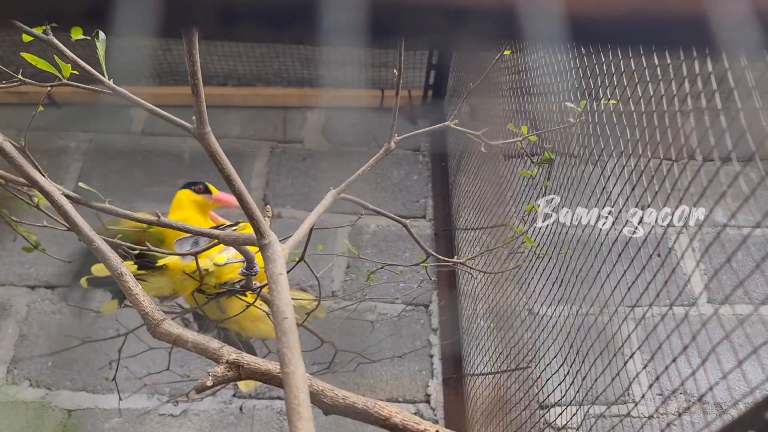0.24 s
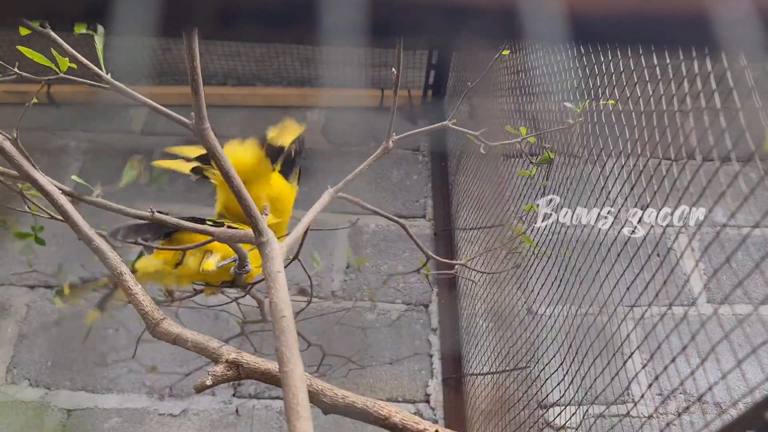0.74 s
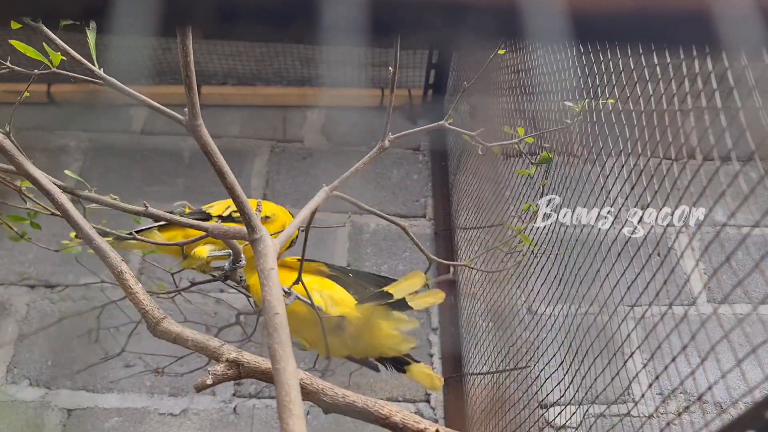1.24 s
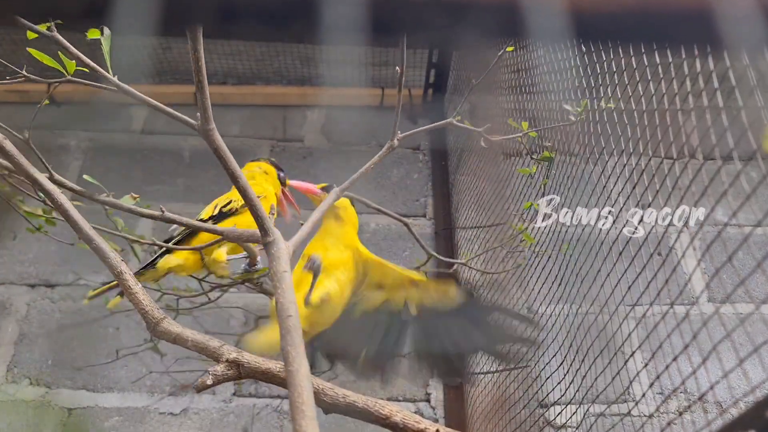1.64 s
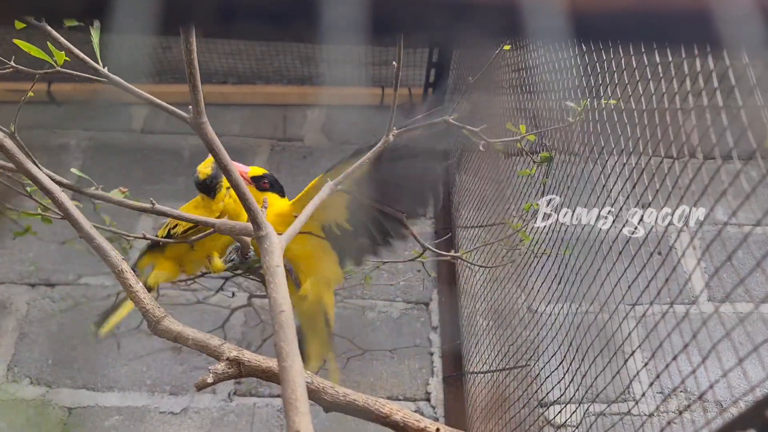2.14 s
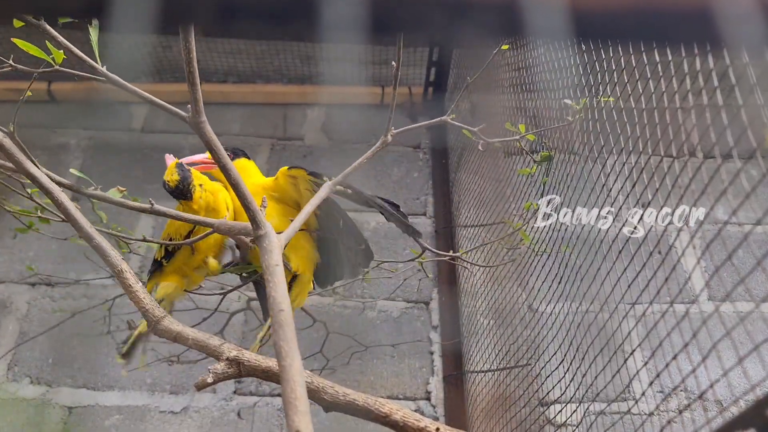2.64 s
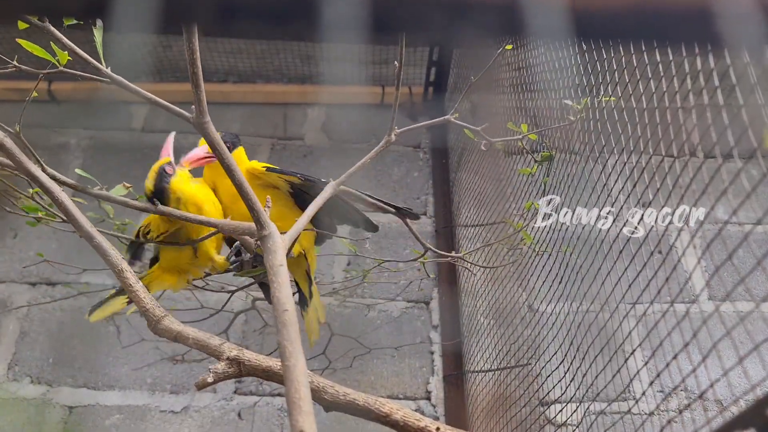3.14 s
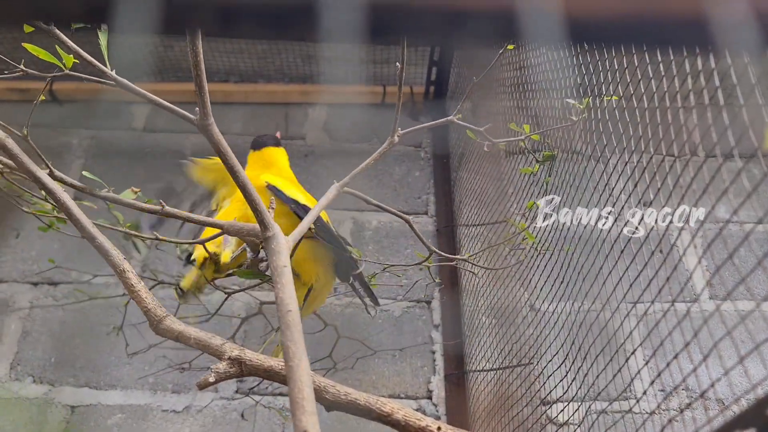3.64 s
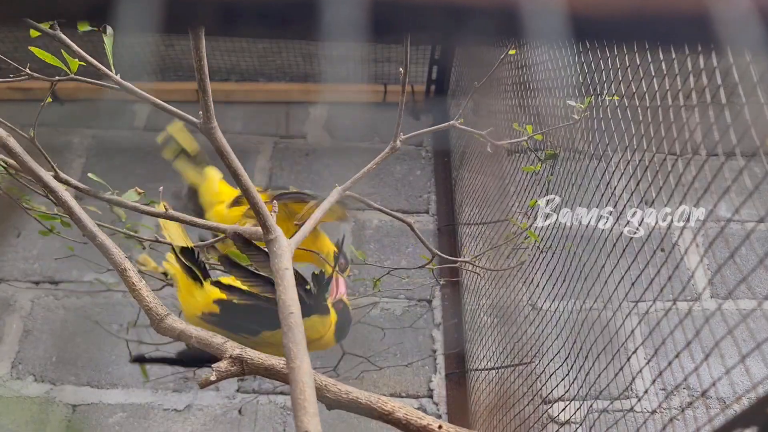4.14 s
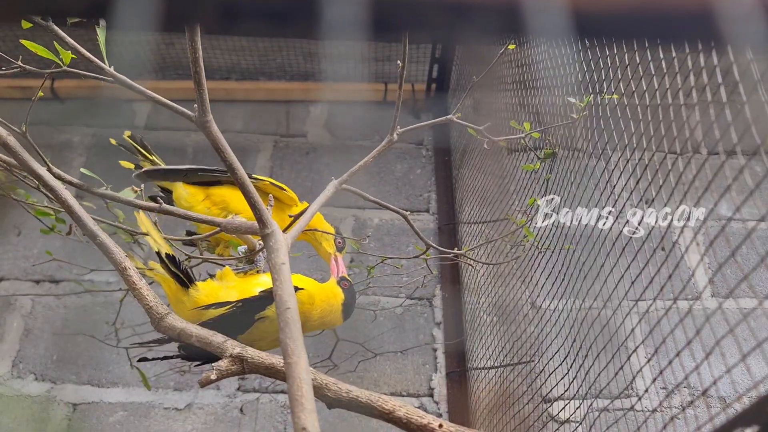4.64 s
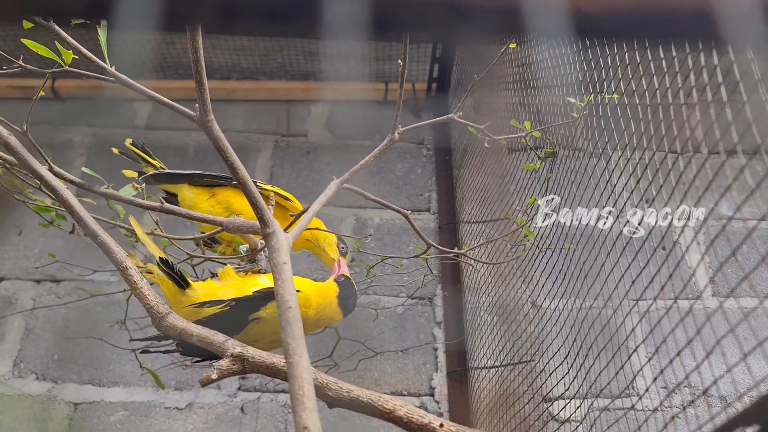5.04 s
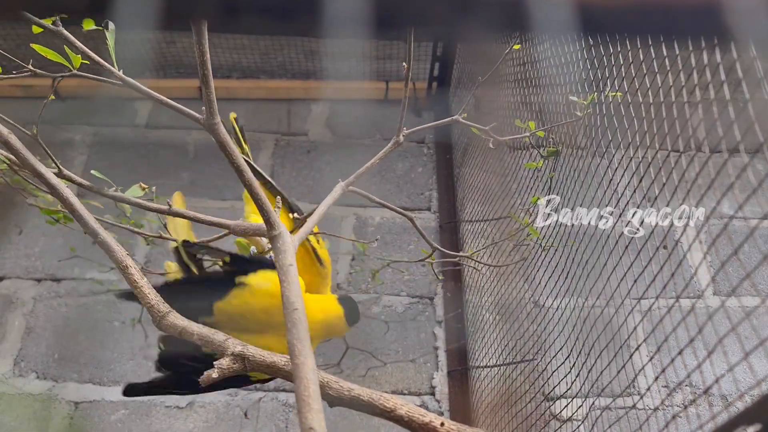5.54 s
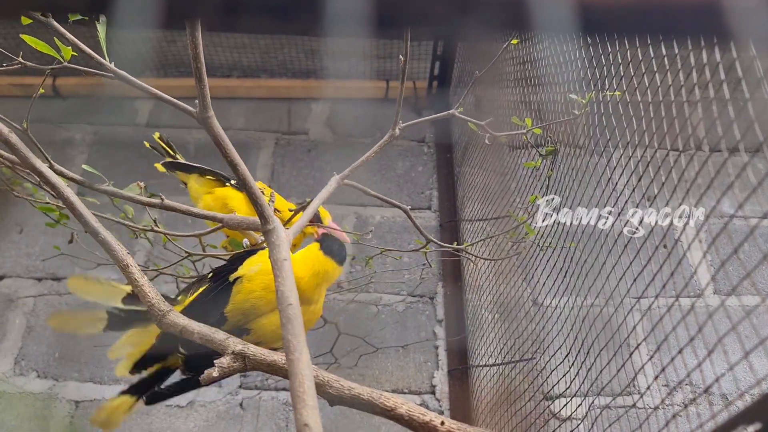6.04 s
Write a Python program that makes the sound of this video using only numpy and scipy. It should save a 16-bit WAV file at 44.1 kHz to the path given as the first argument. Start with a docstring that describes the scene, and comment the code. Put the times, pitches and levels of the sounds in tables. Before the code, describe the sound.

A songbird squalls over and over in harsh, nasal, rasping cries while wings slap and rustle against twigs in a small walled aviary.

```python
"""A small brick aviary, where two orioles fight on a branch. One squalls again and again: harmonics from a
syrinx, roughened by chaotic membranes, pass a throat filter and a beak that sets three ranges. Many calls drop
from a whistle into a nasal, rasping note; the other bird slips in one thin falling chirp. Wings slap and rustle
against the twigs as shaped noise, walls add echoes, and a distant engine (a wavering sine and low noise) drones
under quiet outdoor air (filtered noise)."""
import sys
import numpy as np
from scipy import signal
from scipy.fft import rfft, irfft, next_fast_len
from scipy.io import wavfile
from scipy.ndimage import uniform_filter1d, map_coordinates

SR = 44100
rng = np.random.default_rng(int(sys.argv[2]) if len(sys.argv) > 2 else 0)


def transcribe(signal):
    """Save signal, clipped to [-1, 1], as a 16-bit WAV file at the path in sys.argv[1]."""
    frames = np.atleast_2d(signal).T
    limited = np.clip(frames, -1, 1)
    pcm = np.round(limited * 32767).astype(np.int16)
    wavfile.write(sys.argv[1], SR, pcm)


N = 277389  # length in samples


def amp(db):
    """Decibels express an amplitude ratio on a logarithmic scale."""
    return 10 ** (np.asarray(db) / 20)


def unit(x):
    """Normalization: division by the root mean square gives unit power."""
    return x / np.sqrt(np.mean(x ** 2) + 1e-20)


def along(points, hz):
    """Spectral envelope: (Hz, value) points are joined on a logarithmic frequency axis."""
    f, v = np.transpose(points)
    return np.interp(np.log(hz + 1), np.log(f + 1), v)


def curves(rows):
    """Linear interpolation in time: one curve for each column after the time."""
    s, *cols = np.transpose(rows)
    return [np.interp(np.arange(N) / SR, s, c) for c in cols]


def wobble(rate):
    """Random modulation: a smooth spline through Gaussian knots, rate knots a second."""
    knots = rng.standard_normal(int(N * rate / SR) + 4)
    return map_coordinates(knots, [np.arange(N) * rate / SR])


def filtered(x, response):
    """Linear filtering: the spectrum is multiplied by a response of frequency."""
    m = next_fast_len(N + SR // 2)
    return irfft(rfft(x, m) * response(np.fft.rfftfreq(m, 1 / SR)), m)[..., :N]


def below(hz, edge_hz, order):
    """Low-pass gain: it falls to one half at the edge."""
    return 1 / (1 + (hz / edge_hz) ** order)


def noise(spectrum, apart_hz=1500):
    """Diffuse-field coherence: unit-rms stereo noise, alike in both ears in the bass, unrelated in the treble."""
    def mid_side(hz):
        turn = np.arccos(below(hz, apart_hz, order=2)) / 2
        return amp(along(spectrum, hz)) * [np.cos(turn), np.sin(turn)]

    mid, side = filtered(rng.standard_normal((2, N)), mid_side)
    return unit(np.array([mid + side, mid - side]))


def squalls(edge_db=-0.5, blare_db=-0.5, body_db=-2.0, calm_sway_db=1.0, rough_sway_db=3.5):
    """Source-filter principle: the syrinx sounds through the throat; the beak sets the strength of each range."""
    # resonances of the throat: frequency_hz, gain_db
    throat = [(350, -65), (600, -37.5), (811, -10.5), (1290, -8), (1610, 0.5), (2110, -5.5), (2520, -7.5),
              (2900, -7), (3370, -2.5), (4310, -13), (6230, -13), (7550, -24.5), (10200, -28), (15800, -38)]
    # limits of the voice's ranges (fundamental, body to blare, blare to edge, fizz): edge_hz
    range_edges = [950, 2100, 4200, 11000]
    steady_above_hz = 1240  # a voice pitched higher than this sways less in strength

    pitch, rough, levels, ends_db, airflow = cries()
    pitch, rough, levels = with_surges(pitch, rough, levels)
    pitch, rough = with_whistles(pitch, rough)
    slide, beat_db = stutter()
    source = syrinx(pitch * slide, rough)
    tone = filtered(source, lambda hz: amp(along(throat, hz)) * (1 - below(hz, 435, order=12)))

    # body, blare and edge are levelled, then each follows its own strength
    bottom, low, high, top = range_edges

    def three_bands(hz):
        return np.diff([0 * hz, below(hz, low, order=16), below(hz, high, order=16), 1 + 0 * hz], axis=0)

    ranges = filtered(tone, three_bands)
    power = np.abs(uniform_filter1d(ranges ** 2, size=900, axis=1))
    ranges = ranges / np.sqrt(power + 0.00099 * power.mean(axis=1, keepdims=True))

    # a strained voice breaks, throwing its strength from one range to another
    sway_db = calm_sway_db + rough_sway_db * rough * below(pitch, steady_above_hz, order=12)
    sway = sway_db * np.array([wobble(40) for _ in ranges])
    voice = np.sum(ranges * amp(sway + levels + [[body_db], [blare_db], [edge_db]]), axis=0)

    # the way the beak points colours the fundamental and the highest fizz
    ends = filtered(voice, lambda hz: np.array([below(hz, bottom, order=14), 1 - below(hz, top, order=12)]))
    voice = voice + np.sum((amp(ends_db) - 1) * ends, axis=0)
    grit_db = 1.1 * rough * wobble(260)
    return airflow * voice * amp(beat_db + grit_db)


def cries():
    """Articulation: each cry opens from a shut beak, holds, then sags in pitch and fades."""
    # the cries, levels ahead of beak, surge and trim: start_s, end_s, pitch_hz, roughness (0-1), body_db,
    # blare_db, edge_db, beak_opening_s (time constant), fundamental_gain_db, fizz_gain_db
    rows = np.array([(0, 0.199, 771, .56, -30, -22.5, -19, 0.00067, 1, 5),
                     (0.319, 0.961, 746.7, 0.55, -29, -28.5, -27.5, 0.034, -16, 5.5),
                     (1.134, 1.746, 792, 0.51, -27.5, -31, -27.5, 0.087, -5.5, 0),
                     (1.937, 2.432, 742.5, 0.3, -28, -34.5, -46, 0.022, 1.5, 16),
                     (2.616, 3.231, 823.4, 0.63, -30, -17.5, -35, 0.088, -2, 12),
                     (3.341, 3.733, 804.3, .7, -29.5, -16, -34.5, .065, -0.5, 11),
                     (3.849, 4.175, 805, .62, -24.5, -19.5, -29, .1, -4, 9.5),
                     (4.279, 4.628, 1120, 0.86, -27, -31, -28, 0.075, 0.5, -3),
                     (4.787, 5.166, 1290, .88, -30, -36, -33, 0.042, 3, -11),
                     (5.269, 5.714, 992, 0.82, -25.5, -28.5, -30.5, .1, 0, 6.5),
                     (5.845, 5.916, 1505, 0.39, -28.5, -30.5, -28.5, 0.072, -13, -8),
                     (5.943, 6.3, 939.5, .52, -26.5, -25, -20, 0.065, -4, 5)])
    # weakening while the beak is still shut, one entry each for body, blare and edge: loss_db
    shut = [7, 20.5, 21]
    # weakening as a cry runs out, one entry each for body, blare and edge: loss_db
    fade = [3.5, 6.5, 8.5]
    fade_s, sag_s, sag = 0.046, .05, 0.086  # time constants; share by which the pitch sinks at the end
    attack_s, release_s = 0.0027, 0.0076  # time constants of the airflow

    t = np.arange(N) / SR
    current = np.searchsorted((rows[:-1, 1] + rows[1:, 0]) / 2, t)
    start, end, pitch, rough, body, blare, edge, opening, fundamental, fizz = rows[current].T
    age, left = np.maximum(t - start, 0), np.maximum(end - t, 0)
    levels = np.array([body, blare, edge])
    levels = levels - np.outer(shut, np.exp(-age / opening)) - np.outer(fade, np.exp(-left / fade_s))
    airflow = np.exp(np.minimum(t - start, 0) / attack_s + np.minimum(end - t, 0) / release_s)
    sagging = pitch * (1 - sag * np.exp(-left / sag_s))
    return sagging, rough, levels, np.array([fundamental, fizz]), airflow


def with_surges(pitch, rough, levels):
    """Effort modulation: the pitch arches to another note while clarity and strength hold on a plateau."""
    # surges of effort that clear or break a cry and lift or lower its ranges: middle_s, length_s, pitch_hz,
    # roughness (0-1), body_lift_db, blare_lift_db, edge_lift_db
    surges = [(0.023, 0.073, 730, 0.11, -7.5, -3, 5.5), (0.136, 0.12, 912, 0.06, 2.5, -2, 3),
              (0.529, .16, 848, 0, -5.5, 11, -1.5), (.62, 0.068, 790, 0.44, 9, 0, -2),
              (0.867, 0.11, 713.7, 0.26, 8, -4, -1), (1.448, 0.096, 818, 0.2, 1, 4, -2),
              (1.519, 0.059, 870, 0, 6, 9, 0.5), (1.612, .12, 807.4, 0.19, -1.5, 1.5, 9),
              (1.687, 0.093, 721.4, 0.14, 0.5, 6.5, 1), (2.064, 0.13, 780, 0.13, 1, 3, -0.5),
              (2.277, .16, 803, 0.07, 1, 0, -1.5), (2.401, 0.068, 705, 0.13, 3.5, 2.5, -12),
              (2.639, 0.081, 680.5, 0.34, 4, -13, -21.5), (2.746, 0.12, 764.5, 0.44, 9.5, -10.5, -7.5),
              (2.9, .14, 822, 0, 5.5, -2.5, -5), (3.06, 0.15, 826, 0.55, 2.5, 2, 3),
              (3.511, 0.079, 864, 0.35, 0.5, -1.5, 12.5), (3.576, .12, 847, 0.11, 1.5, -2, -2),
              (3.673, 0.082, 735.5, .6, 5, -4.5, 4), (4.103, 0.067, 885.3, 0, 4, 8, 12),
              (4.153, 0.036, 742, 0.23, 11, -8, 6.5), (5.463, 0.061, 1097, .9, 1, 4, 0),
              (5.518, .047, 835, .4, 0, 9, -2), (5.646, 0.1, 787, 0.01, 7, 0, 7),
              (6.133, .12, 891.3, 0.06, 2.5, -9.5, 5), (6.225, 0.096, 810, 0.3, 1, -1.5, 5)]
    t = np.arange(N) / SR
    for middle, length, hz, surge_rough, *lift_db in surges:
        away = np.minimum((2 * (t - middle) / length) ** 2, 10)
        arch, plateau = np.exp(-away), np.exp(-away * away)
        pitch = pitch + arch * (hz - pitch)
        rough = rough + plateau * (surge_rough - rough)
        levels = levels + np.outer(lift_db, plateau)
    return pitch, rough, levels


def with_whistles(pitch, rough):
    """Exponential glide: every whistle falls equal octaves in equal times, then breaks into the squawk."""
    # falling whistles that lead into the cries: start_s, length_s, top_pitch_hz, roughness (0-1)
    whistles = [(1.134, .12, 1900, .65), (1.94, 0.061, 1412, 0.64), (3.341, .05, 1501, 1),
                (3.851, .13, 1511, .72), (4.275, .12, 2000, .15), (4.788, .062, 1990, .4),
                (5.275, .15, 2022, 0.34), (5.845, 0.072, 2203, .4), (5.942, .055, 1990, .45),
                (6.001, .035, 1604, .45)]
    octaves_per_s, lowest_hz = 8.3, 1045  # speed of the fall, and where it settles
    break_s = .012  # time in which the voice flips between whistle and squawk

    t = np.arange(N) / SR
    for start, length, top_hz, whistle_rough in whistles:
        inside_s = np.minimum(t - start + break_s, start + length - t)
        share = np.clip(inside_s / break_s + .5, 0, 1)
        hz = np.maximum(top_hz * 2 ** (-octaves_per_s * np.maximum(t - start, 0)), lowest_hz)
        pitch = pitch + share * (hz - pitch)
        rough = rough + share * (whistle_rough - rough)
    return pitch, np.clip(rough, 0, 1)


def stutter(rate=21, fall=0.62, swell_db=5.0):
    """Joint frequency and amplitude modulation: every beat of a trill starts high, slides down and swells."""
    # trills in the call: start_s, end_s, depth (0-1)
    trills = [(4.469, 4.64, .75), (4.877, 5.17, 1.0)]
    t, slide, beat = np.arange(N) / SR, np.zeros(N), np.zeros(N)
    for start, end, depth in trills:
        inside = depth * (t > start) * (t < end)
        turn = ((t - start) * rate + .13 * wobble(20)) % 1  # unsteady place within the beat
        slide += inside * (.5 - turn)
        beat += inside * (np.sin(np.pi * turn) - 2 / np.pi)
    return np.exp(fall * uniform_filter1d(slide, size=200)), swell_db * beat


def syrinx(pitch, rough, jitter=.05, tremor=0.005, shudder=0.38, split=0.21, doubling=0.33, rasp=0.74,
           flicker_db=5.0, purity=0.29, breakup=1.52):
    """Nonlinear oscillation: in chaotic membranes the harmonics' cycles vary in length and size and shed noise."""
    hz = pitch * (1 + tremor * wobble(90) + jitter * rough * wobble(330))
    hz = hz * (1 + .04 * rough * wobble(75))
    phase = 2 * np.pi * np.cumsum(hz) / SR

    # a high note loses its overtones, the more so when strained
    rolloff = (purity + breakup * rough) * np.clip(np.log2(pitch / 880), 0, 1)
    stack = 0
    for k in np.arange(1, 21):
        size = amp(flicker_db * wobble(28)) * (k * hz < SR / 2) * k ** -rolloff
        smear = .45 * k * k  # the windpipe smears each pulse in time
        stack = stack + size * np.cos(k * phase + smear) / np.pi

    # strain makes every second or third cycle stronger, which puts lines between the harmonics
    uneven = split * np.cos(phase / 3 + wobble(60)) + doubling * np.cos(phase / 2 + wobble(25))
    stack = stack * (1 + rough * (shudder * wobble(520) + 2 * uneven))
    pulsed = rng.standard_normal(N) * (1 + .5 * np.cos(phase))
    hiss = filtered(pulsed, lambda f: 1 - below(f, 1940, order=2))
    return stack + rasp * rough ** 0.56 * hiss


def chirp(jitter=0.0172):
    """Frequency modulation: the other bird's thin falling note is a sine with a jittered pitch."""
    # path of the note: time_s, pitch_hz, level_db (rms)
    path = [(2.19, 4920, -45), (2.215, 4430, -36), (2.26, 3210, -28), (2.3, 2980, -26.5)]
    hz, db = curves(path)
    t = np.arange(N) / SR
    phase = 2 * np.pi * np.cumsum(hz * (1 + jitter * wobble(500))) / SR
    sounding = (t > path[0][0]) * (t < path[-1][0])
    return sounding * amp(db) * np.sqrt(2) * np.sin(phase)


def at_microphones(x, toss_ms=0.017):
    """Time difference of arrival: the left microphone leads, by an amount that shifts as the bird tosses its head."""
    # mean lead at the left microphone: time_s, lead_ms
    leads = [(0, 0.086), (1.6, 0.097), (2.2, 0.18), (3.2, 0.17), (4.1, 0.098), (6.29, 0.091)]
    lead = (curves(leads)[0] + toss_ms * wobble(7)) * SR / 1000  # in samples
    return np.array([map_coordinates(x, [np.arange(N) + side * lead / 2]) for side in (1, -1)])


def wings(rise_s=0.0016, slap_db=-5, thud_db=-7, grain_db=3):
    """Transient noise: a stroke is an air puff and a feather crackle; between strokes plumage rubs on twigs."""
    # wing strokes, levels ahead of the trims: peak_s, slap_level_db, thud_level_db (relative to slap), t60_s
    strokes = [(0.263, -25.5, -22, 0.057), (0.632, -22, -16, 0.055), (0.696, -21.5, -7.5, 0.095),
               (0.988, -15.5, -13, 0.092), (1.042, -24.5, -7, 0.043), (1.087, -29, -21, 0.063),
               (1.74, -16.5, -16, 0.086), (1.818, -23, -13, 0.078), (2.167, -19, -12.5, 0.096)]
    # spectrum of the feathers: frequency_hz, gain_db
    feathers = [(290, -9.5), (500, -8.5), (1440, -6.5), (2560, -7), (3420, -7.5), (4240, -15), (11300, -14),
                (15800, -12.5)]
    # rustle between the strokes: time_s, level_db
    scuffle = [(0, -39.5), (1.1, -37.5), (1.8, -34.5), (1.9, -51.5), (4.2, -50.5), (4.7, -76), (6.29, -44)]

    t, slap, thud = np.arange(N) / SR, np.zeros(N), np.zeros(N)
    for s, db, low_db, t60 in strokes:
        rise = np.exp(np.minimum(t - s, 0) / rise_s)
        decay = amp(-60 * np.maximum(t - s, 0) / t60)
        stroke = amp(db) * rise * decay
        slap += stroke
        thud += stroke * amp(low_db)
    rustle = amp(curves(scuffle)[0]) * unit(amp(8.5 * wobble(25.16)))
    crackle = unit(noise(feathers) * amp(grain_db * wobble(700)))
    puff = noise([(60, -22), (150, -23), (400, 25), (700, -17), (1500, -40)])
    return (amp(slap_db) * slap + rustle) * crackle + amp(thud_db) * thud * puff


def aviary(x, tail_db=-21, count=5):
    """Early reflection and reverberation: walls return copies on shifting paths, then a short tail decays."""
    # decay between the walls: frequency_hz, t60_s
    walls = [(200, 0.069), (2000, 0.38), (12000, 0.026)]
    hz, t, z = signal.stft(rng.standard_normal((2, SR // 2)), SR, nperseg=256)
    decay = amp(-60 * t / along(walls, hz)[:, None])
    tail = signal.istft(z * decay, SR, nperseg=256)[1]
    late = signal.fftconvolve(x, tail / np.linalg.norm(tail[0]), axes=1)[:, :N]

    bright = filtered(x, lambda f: 1 - below(f, 580, order=2))

    def echo(ear):
        # 1 to 16 ms late, wandering slightly as the birds move
        delay = SR * (rng.uniform(.001, .016) + .00004 * wobble(5))
        return np.interp(np.arange(N) - delay, np.arange(N), ear)

    early = np.array([sum(echo(ear) for _ in range(count)) for ear in bright])
    early = amp(-5.5) * early / np.sqrt(count)
    return x + early + amp(tail_db) * late


def outdoors(drone_hz=71.1, drone_db=-1, rumble_db=-2, air_db=-42.5):
    """Tonal and broadband background: a distant engine drones and rumbles under the steady air."""
    # the engine, ahead of the trims: time_s, drone_level_db, rumble_level_db
    engine = [(0.0, -40.5, -31.5), (0.89, -41, -41), (2.6, -37.5, -47.5), (3.12, -33, -48.5),
              (3.35, -35, -49), (4.62, -54, -49.5), (4.92, -36, -44), (6.29, -50, -49.5)]
    # spectrum of the air: frequency_hz, gain_db
    air = [(20, -35), (36, -9.5), (51, 1), (68, -8.5), (190, -18.5), (530, -20.5), (830, -29),
           (1150, -29.5), (4200, -41), (7400, -33), (15800, -64)]
    drone, rumble = curves(engine)
    firing = np.sin(2 * np.pi * np.cumsum(drone_hz * (1 + 0.028 * wobble(13))) / SR)
    hum = amp(drone + drone_db) * unit(firing * amp(2.5 * wobble(12)))
    roll = amp(rumble + rumble_db) * noise([(50, -3), (90, 2.5), (170, 2.0), (260, -18.0), (600, -40)])
    # the background is 2 dB louder in the right channel than in the left
    return (hum + roll + amp(air_db) * noise(air)) * amp([[-1], [1]])


def scene():
    """Superposition: birds and wings sound within the walls, and the outdoor background is added."""
    birds = at_microphones(squalls() + chirp()) + wings()
    # the two microphones colour the birds differently: frequency_hz, left_minus_right_db
    difference = [(1500, -2.6), (2600, .5), (3400, -.5), (4800, 3), (8000, 0), (11000, -3)]
    tilted = filtered(birds, lambda hz: amp(along(difference, hz) * np.array([[.5], [-.5]])))
    return aviary(tilted) + outdoors()


def record(dry, top_hz=15850):
    """Saturation and band limiting: the highest peaks are rounded and nothing above the limit is kept."""
    rounded = dry / (1 + (dry / .9) ** 6) ** (1 / 6)
    return filtered(rounded, lambda hz: hz < top_hz)


dry = scene()
out = record(dry)
transcribe(out)
```